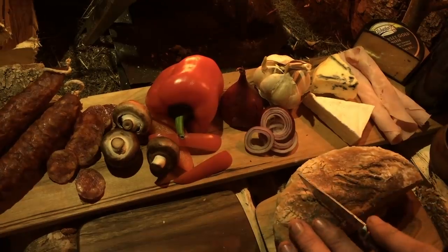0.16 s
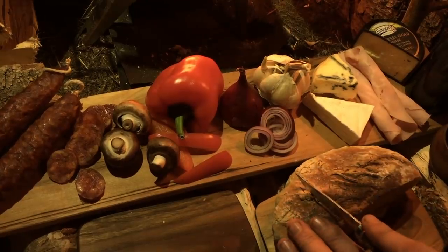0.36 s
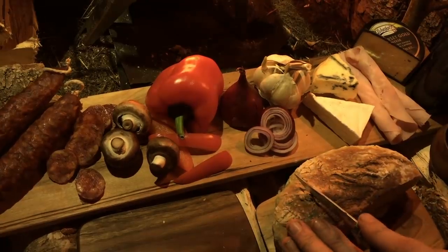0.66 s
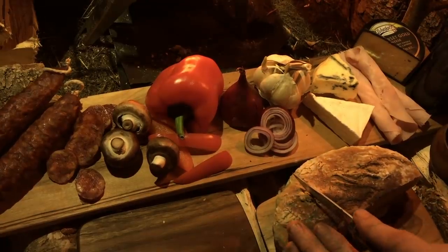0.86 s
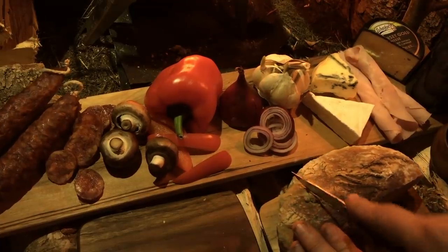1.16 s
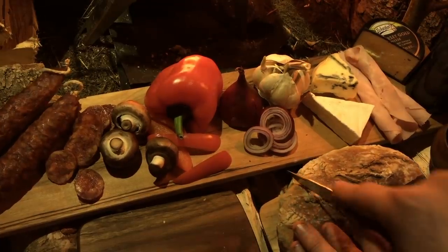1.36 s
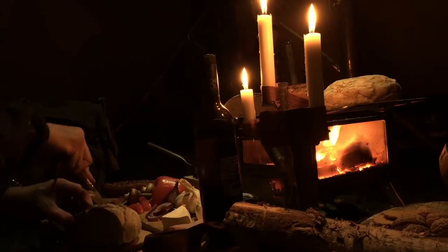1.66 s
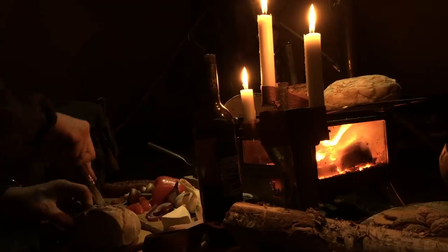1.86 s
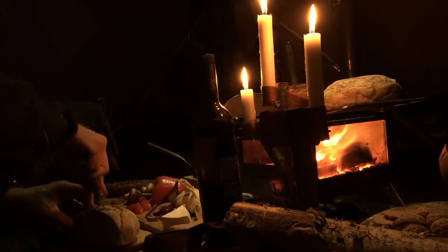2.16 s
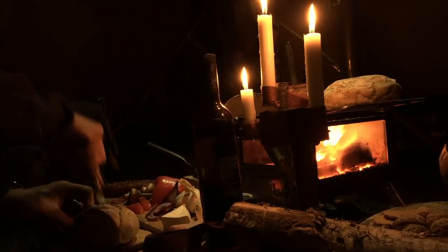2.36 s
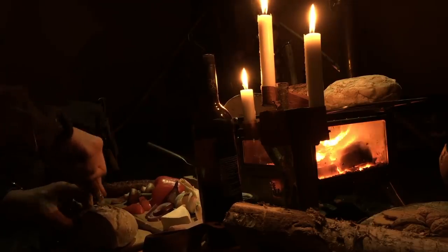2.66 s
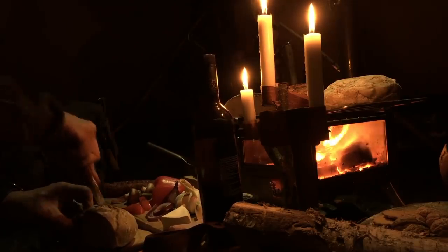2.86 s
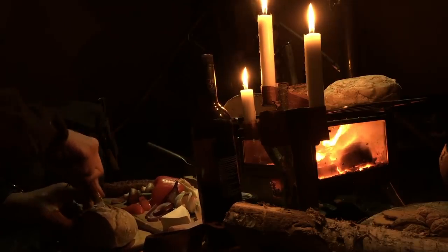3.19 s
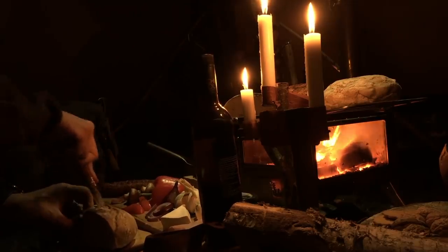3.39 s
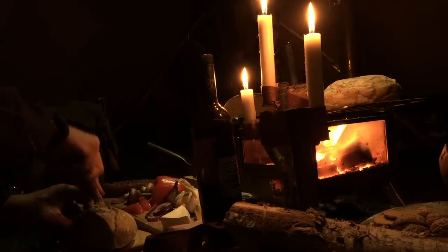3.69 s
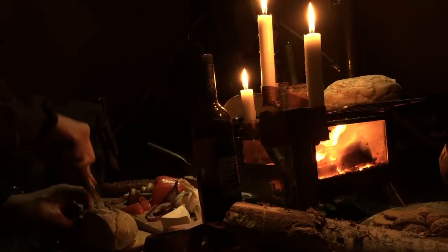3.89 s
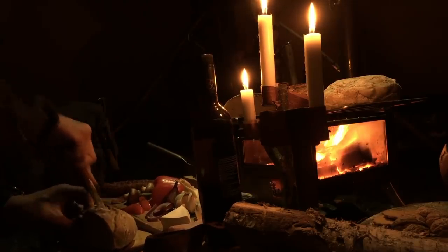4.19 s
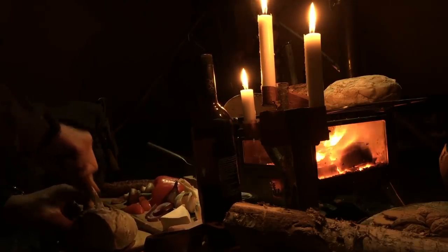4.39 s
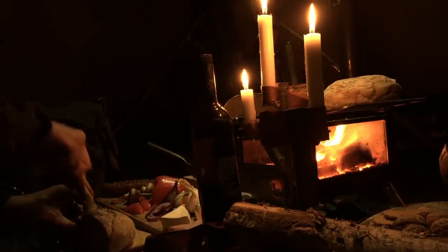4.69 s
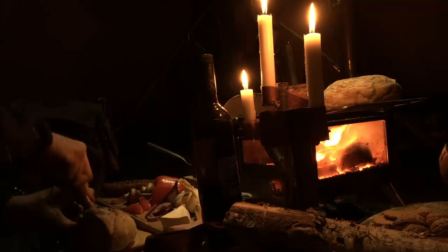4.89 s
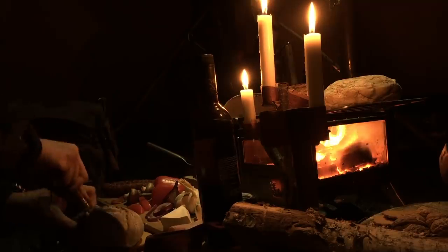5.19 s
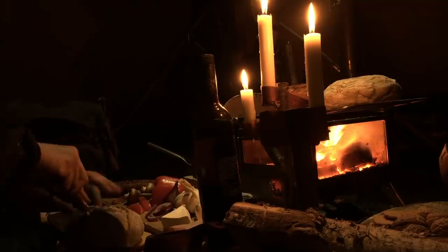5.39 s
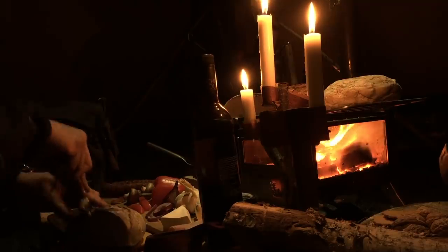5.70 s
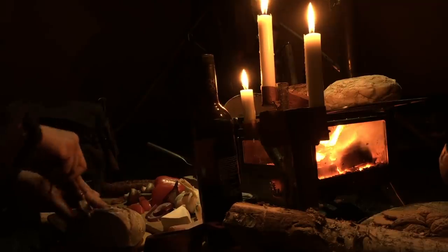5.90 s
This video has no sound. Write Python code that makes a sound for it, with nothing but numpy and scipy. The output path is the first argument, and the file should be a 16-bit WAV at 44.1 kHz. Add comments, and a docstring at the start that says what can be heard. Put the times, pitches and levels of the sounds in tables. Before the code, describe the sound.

A knife saws in short, crunchy strokes through a crusty loaf while a wood stove rumbles softly and crackles with sharp snaps close by.

```python
"""In a small shelter beside a wood stove, a knife saws through a crusty loaf.
The blade rasps through crust and crumb (grainy noise) and shakes the loaf (noise through resonances).
Crust and burning wood snap (short noise bursts), splinters ring, and the blade knocks on the cutting board.
The stove rumbles and hisses (coloured noise). From 1.55 s on, loaf and stove are heard from another spot,
where the draught hums (two wavering sine tones)."""
import sys
import numpy as np
from scipy import signal
from scipy.fft import rfft, irfft, next_fast_len
from scipy.io import wavfile
from scipy.ndimage import uniform_filter1d, map_coordinates

SR = 44100
rng = np.random.default_rng(int(sys.argv[2]) if len(sys.argv) > 2 else 0)


def generate_wav(sig):
    """Save sig (samples, or channels by samples) to the path in sys.argv[1] as 16-bit PCM at SR."""
    pcm = np.round(np.clip(np.atleast_2d(sig).T, -1, 1) * 32767).astype(np.int16)
    wavfile.write(sys.argv[1], SR, pcm)


N = 266799

# Sharp cracks of crust and embers, levels before the final trims:
# start_s [s], treble_db [dB], body_db [dB, low part compared with treble]
CRACKS = [(0.2273, -29, 2.5), (0.2664, -22.5, -25), (0.4373, -34, -3), (0.474, -23, -5.5),
          (0.6473, -19, -9), (0.676, -22.5, -1.5), (0.7172, -16.5, -17), (0.7745, -10.5, -17),
          (0.8403, -14, -18), (0.9189, -11, -19), (0.928, -16.5, -8), (0.9688, 4.5, -1.5),
          (0.9862, -4.5, -12), (1.0525, 1.5, -38), (1.07, -5.5, -19), (1.0773, -16.5, -4), (1.1046, -15, 1),
          (1.117, -17, 3.5), (1.1446, 2, -4), (1.251, -22, -9), (1.2652, -18, -15), (1.34, -12.5, -16),
          (1.3492, -12.5, -11.5), (1.39, -14, -25), (1.4421, -18, -33), (1.4735, -27, -23),
          (1.4887, -12.5, -14), (1.5657, -16, -14), (1.6303, -15.5, -1.5), (1.8372, -17, -15),
          (1.8486, -28, -13), (1.9033, -28, -19), (1.94, -20, -13), (1.9802, -7.5, -19), (2.0026, 5, -8),
          (2.056, -8, -26), (2.1061, -5.5, -11), (2.134, -15, -13), (2.147, -8.5, -4.5), (2.1683, -11, -17),
          (2.187, -15, -20), (2.2151, -13.5, -4.5), (2.308, -24, -10), (2.346, -27, 3.5),
          (2.4183, -21, -22), (2.668, -14.5, -18), (2.7158, -23, -18), (2.7285, -20, -30), (2.765, -22, -3),
          (2.782, -24, 1), (2.812, -14, -5.5), (2.8859, -12, -11.5), (2.903, -12, -37), (2.909, -9.5, -26),
          (2.952, -9, -30), (2.996, -11, -44), (3.0493, -3.5, -10.5), (3.0575, 2.5, 2.5),
          (3.0682, 1.5, -1.5), (3.133, -18, -3.5), (3.162, -8.5, -18), (3.173, -3, -47), (3.2032, -16, -30),
          (3.237, -3.5, -38), (3.2429, -15, -28), (3.2524, -18, -15), (3.277, -6.5, -21), (3.29, -6.5, -29),
          (3.311, -12, -16), (3.3647, -29, 6.5), (3.3708, -6.5, -54), (3.4507, -10.5, -4.5),
          (3.461, -11.5, -4.5), (3.5248, -5.5, -16), (3.5352, -9, -25), (3.5472, -7, -23), (3.562, -8, -26),
          (3.585, -11.5, -30), (3.663, -25, 1.5), (3.7185, -12, -15), (3.743, -10.5, -22),
          (3.9098, -3.5, 5.5), (3.9412, -13, -21), (3.954, -22, -20), (4.0243, -10, -15), (4.0366, -10, -8),
          (4.0627, -15, 2), (4.132, -28, -22), (4.147, -14, -14), (4.176, -18, -24), (4.185, -24, -24),
          (4.1916, -13, -9.5), (4.293, -26, -11), (4.301, -27, -9), (4.339, -7.5, -5.5), (4.3996, -8, -28),
          (4.4146, -10, -15), (4.42, -9, -30), (4.458, -5, -30), (4.4612, -9, -25), (4.5534, -8.5, -9),
          (4.579, -0.5, -10.5), (4.5983, -7, -12), (4.6263, 5.5, -11), (4.6685, -5, -9), (4.6923, -8, -10),
          (4.733, -11, -5.5), (4.772, -5.5, -22), (4.784, -10, -18), (4.797, 1, -10.5), (4.816, -14, -20),
          (4.9094, -33, 10.5), (4.9178, -26.5, 2.5), (4.9258, -26, -14), (5.072, -12.5, -25),
          (5.1826, -22, 1), (5.2212, -5, -19), (5.238, -30, 3), (5.2473, -26, -16), (5.253, -7.5, -15),
          (5.2651, -26, -24), (5.29, -18.5, -12.5), (5.5062, -26, 1.5), (5.5119, -16, -3.5),
          (5.6565, -8.5, -14), (5.6642, -4, -6), (5.778, -23, -4), (5.8558, -25.5, -16),
          (6.0187, -23, -1.5), (6.033, -17, -21)]


def amp(db):
    """Turn decibels into a gain."""
    return 10 ** (np.asarray(db) / 20)


def unit(x):
    """Scale a sound to an average (rms) level of 1."""
    return x / np.sqrt(np.mean(x ** 2) + 1e-20)


def curves(rows):
    """Draw straight lines between table rows: one value per sample for each column after the time."""
    start_s, *columns = np.transpose(rows)
    now_s = np.arange(N) / SR
    return [np.interp(now_s, start_s, column) for column in columns]


def wobble(rate):
    """A smooth random curve through `rate` random points a second."""
    points = rng.standard_normal(int(N * rate / SR) + 4)
    return map_coordinates(points, [np.arange(N) * rate / SR])


def coloured(x, points):
    """Filter x to a (Hz, dB) curve without pre-echo; white noise keeps its rms level."""
    hz, db = np.transpose(points)
    size = 2 ** 14
    bin_hz = np.fft.rfftfreq(size, 1 / SR)
    gain_db = np.interp(np.log(bin_hz + 1), np.log(hz + 1), db)
    # folding the cepstrum puts the filter's energy as early as possible
    cepstrum = irfft(np.log(amp(gain_db) + 1e-5))
    cepstrum[1:size // 2] *= 2
    cepstrum[size // 2 + 1:] = 0
    pulse = irfft(np.exp(rfft(cepstrum)))
    return signal.fftconvolve(x, pulse / np.linalg.norm(pulse))[:N]


def resonant(x, modes):
    """Noise through (Hz, width Hz, dB) resonances, fading out below the first one; rms 1."""
    size = next_fast_len(N + SR // 2)
    f = np.fft.rfftfreq(size, 1 / SR)
    response = 0
    for k, (hz, width_hz, db) in enumerate(modes):
        # neighbouring resonances take opposite signs
        band = 1j * f * width_hz
        response = response + (-1) ** k * amp(db) * band / (hz * hz - f * f + band)
    low_cut = 1 + (0.75 * modes[0][0] / (f + 1)) ** 8
    return unit(irfft(rfft(x, size) * response / low_cut, size)[:N])


def patchy(x, depth_db):
    """x with random louder and softer patches in time and frequency."""
    spectrum = signal.stft(x, nperseg=256)[2]
    field = uniform_filter1d(rng.standard_normal(spectrum.shape), 5, 0)
    field = uniform_filter1d(field, 9, 1)
    return signal.istft(spectrum * amp(depth_db * unit(field)), nperseg=256)[1][:N]


def crumbs(rate, spread_db, life_s):
    """Noise in short bursts of very unequal size, `rate` a second, each falling 60 dB in life_s."""
    starts = rng.random(N) < rate / SR
    sizes = starts * amp(spread_db * np.minimum(rng.exponential(size=N), 3.5))
    t = np.arange(SR // 20) / SR
    envelope = signal.fftconvolve(sizes, amp(-60 * t / life_s))[:N]
    return unit(envelope * rng.standard_normal(N))


def far_spot():
    """0 at the first listening spot, 1 at the second, with a short crossfade."""
    move_s, fade_s = 1.55, 0.048
    return np.clip((np.arange(N) / SR - move_s) / fade_s, 0, 1)


def knife():
    """Teeth tear the crust in grains; the same tearing shakes the hollow loaf."""
    # Colour of the torn crust: pitch_hz [Hz], level_db [dB per Hz]
    crust_colour = [(1180, -57.5), (2000, -5.5), (3160, -11), (3710, -8.5), (5320, -3.5), (7840, -7),
                    (8720, -3.5), (10700, -4.5), (13200, -4), (15700, -9), (16400, -47)]
    # Loaf resonances heard at the first spot: pitch_hz [Hz], width_hz [Hz], level_db [dB]
    near_modes = [(650, 300, -14), (1300, 240, 0), (1800, 250, -5), (2700, 180, -3), (3800, 240, -2),
                  (6200, 250, -9)]
    # Loaf resonances heard at the second spot: pitch_hz [Hz], width_hz [Hz], level_db [dB]
    far_modes = [(691, 172, 3), (1760, 304, 1), (2520, 90, -0.5), (3140, 170, -1.5), (4130, 210, -1),
                 (5500, 430, -2)]
    # Sawing carried into the table: pitch_hz [Hz], level_db [dB per Hz]
    table_colour = [(120, -14), (200, -3.5), (300, -3.5), (400, -17), (550, -17.5)]
    rasp_db, loaf_db = effort()
    far = far_spot()
    # the blade sticks and slips: a random level in dB
    jerks_db = 1.5 * wobble(80)
    tearing = 0.36 * crumbs(rate=500, spread_db=2.5, life_s=0.004) + 0.55 * rng.standard_normal(N)
    shaking = 0.55 * crumbs(rate=300, spread_db=2, life_s=0.015) + 0.75 * rng.standard_normal(N)
    shaking += 0.2 * tearing
    rasp = unit(amp(jerks_db) * coloured(patchy(tearing, depth_db=2.5), crust_colour))
    loaf = (1 - far) * resonant(shaking, near_modes) + far * resonant(shaking, far_modes)
    loaf += far * amp(-11.5) * coloured(shaking, table_colour)
    return amp(rasp_db + 0.12) * rasp + amp(loaf_db + 0.74 + jerks_db) * loaf


def effort():
    """Rasp and loaf level in dB: strokes, crumbs after each crack and a rest level add as powers."""
    # Knife strokes: start_s [s], length_s [s], rasp_start_db [dB], rasp_end_db [dB],
    # loaf_db [dB, compared with the rasp]
    strokes = [(0.127, 0.013, -34.5, -50, -21), (0.205, 0.029, -49, -41.5, 2),
               (0.306, 0.031, -50, -51.5, 7), (0.414, 0.0068, -63, -46.5, 8), (0.596, 0.34, -47, -52, -4),
               (1.065, 0.033, -49, -30.5, -2), (1.275, 0.14, -42.5, -42, -5), (1.471, 0.11, -46, -39, -6),
               (1.581, 0.15, -49.5, -40.5, -7), (1.854, 0.15, -45, -55, -9.5),
               (2.021, 0.18, -30, -30.5, -5), (2.345, 0.097, -45.5, -41, -2.5),
               (2.508, 0.093, -52, -30.5, -6.5), (2.614, 0.073, -36, -39.5, -0.5),
               (2.814, 0.13, -36, -54, -6.5), (3.151, 0.27, -39.5, -41.5, -7),
               (3.511, 0.12, -32.5, -37.5, -3), (3.72, 0.14, -40, -43.5, -5),
               (3.913, 0.15, -30.5, -30.5, -8), (4.149, 0.11, -42.5, -41, -5),
               (4.339, 0.15, -38.5, -29, -3.5), (4.576, 0.16, -32.5, -33.5, -8.5),
               (4.779, 0.044, -26, -32.5, 3.5), (4.91, 0.04, -52, -42, -4), (4.977, 0.14, -40, -36.5, -2.5),
               (5.188, 0.061, -41.5, -52, -12), (5.601, 0.046, -54.5, -65, 7),
               (5.787, 0.02, -33.5, -48, -11.5), (5.99, 0.063, -61, -41, -10)]
    # Faint crumbling between strokes: start_s [s], rasp_db [dB], loaf_db [dB]
    rest = [(0, -48, -59.5), (2.3, -52, -57.5), (6.05, -54, -60.5)]
    # the teeth bite quickly and leave the crumb more slowly
    bite_db_per_s, lift_db_per_s = 1200, 455
    # crumbs shower after a crack: level compared with it, fade, share of its body_db given to the loaf
    crumble_start_db, crumble_db_per_s, loaf_share = -24, 412, 0.7

    t = np.arange(0, N + 16, 16) / SR  # every 16th sample is enough
    start_s, length_s, start_db, end_db, loaf_db = np.transpose(strokes)[..., None]
    stroke_db = start_db + (end_db - start_db) * np.clip((t - start_s) / length_s, 0, 1)
    stroke_db = stroke_db - bite_db_per_s * np.maximum(start_s - t, 0)
    stroke_db = stroke_db - lift_db_per_s * np.maximum(t - start_s - length_s, 0)

    crack_s, treble_db, body_db = np.transpose(CRACKS)[..., None]
    fading_db = treble_db + crumble_start_db - crumble_db_per_s * (t - crack_s)
    crumble_db = np.where(t > crack_s, fading_db, -200)

    rasp_layers = (stroke_db, crumble_db)
    loaf_layers = (stroke_db + loaf_db, crumble_db + loaf_share * body_db)
    levels_db = []
    for layers, rest_db in zip((rasp_layers, loaf_layers), curves(rest)):
        power = sum(np.sum(amp(db) ** 2, 0) for db in layers)
        power = np.interp(np.arange(N) / SR, t, power)
        levels_db.append(10 * np.log10(power + amp(rest_db) ** 2))
    return levels_db


def snaps():
    """Each crack is a burst of a few milliseconds, then a weaker tail of splinters and near walls."""
    # Edge of a crack: pitch_hz [Hz], level_db [dB per Hz]
    edge_colour = [(1500, -81), (3000, -29.5), (4500, 2), (9000, 6.5), (13500, 6.5), (15700, 4),
                   (16500, -35)]
    # Body of a crack: pitch_hz [Hz], level_db [dB per Hz]
    body_colour = [(90, -23), (230, 0.5), (430, -3.5), (700, 4.5), (1700, 6.5), (2500, 13), (3500, 1.5),
                   (4800, 10), (6500, 2.5), (9200, 6.5), (13000, -7)]
    treble, body, t = np.zeros(N + SR), np.zeros(N + SR), np.arange(SR // 10) / SR
    tail = amp(-18.0 - 60 * t / 0.02)
    rise = 1 - np.exp(-t / 0.00016)
    treble_fade = amp(-60 * t / 0.0032) + tail
    body_fade = amp(-60 * t / 0.012) + amp(-13.0) * tail
    for start_s, db, body_db in CRACKS + ticks():
        i = round(start_s * SR)
        noise = np.sign(rng.standard_normal(len(t))) + 0.5 * rng.standard_normal(len(t))
        # every splinter has its own colour, a comb of chance spacing
        noise = rise * unit(noise + 0.6 * np.roll(noise, rng.integers(4, 24)))
        treble[i:][:len(t)] += amp(db - 1.0) * treble_fade * noise
        body[i:][:len(t)] += amp(db + body_db) * body_fade * noise
        # the first break is one firm push
        body[i] += amp(db + body_db + 11)
    return coloured(treble, edge_colour) + amp(-4.5) * coloured(body, body_colour)


def ticks():
    """Thin, mostly faint ember ticks at random times, as rows like the cracks."""
    ticks_per_s, base_db, spread_db = 6, -35, 2.5
    draw = rng.random((round(ticks_per_s * N / SR), 3))
    return [(u * N / SR, base_db - spread_db * np.log(v), -10 - 15 * w) for u, v, w in draw]


def splinters():
    """After every listed crack six short modes ring at chance pitches; low ones follow its body."""
    below_crack_db, t60_s = -21.5, 0.029
    low_hz, high_hz = 910, 8960
    out, t = np.zeros(N + SR), np.arange(SR // 16) / SR
    places = rng.random((len(CRACKS), 6, 1))  # 0 = lowest pitch, 1 = highest
    for (start_s, db, body_db), place in zip(CRACKS, places):
        hz = low_hz * (high_hz / low_hz) ** place
        modes = amp((1 - place) * body_db) * np.sin(2 * np.pi * hz * t)
        fade = amp(db + below_crack_db - 60 * t / t60_s)
        out[round(start_s * SR):][:len(t)] += fade * modes.sum(0)
    return out[:N]


def pings():
    """A splinter rings as it breaks: one short sine, roughened by random phase steps."""
    # Ringing splinters: start_s [s], peak_db [dB], pitch_hz [Hz]
    ping_rows = [(0.4379, -22, 1450), (1.6306, -16.5, 4580), (3.4502, -13.5, 4570), (3.4618, -22, 4470)]
    t60_s = 0.01
    out, t = np.zeros(N + SR), np.arange(SR // 16) / SR
    for start_s, db, hz in ping_rows:
        roughness = np.cumsum(rng.normal(0, 0.12, len(t)))
        tone = np.sin(2 * np.pi * hz * t + roughness)
        out[round(start_s * SR):][:len(t)] += amp(db - 60 * t / t60_s) * tone
    return out[:N]


def board():
    """The board answers the blade with a dry noise slap and a set of short, uneven ringing modes."""
    # Blade meets board, level before the trims below: start_s [s], level_db [dB], pitch_hz [Hz]
    knocks = [(1.722, -36, 670), (2.212, -21.5, 820), (2.346, -30.5, 704), (2.679, -15.5, 798),
              (3.155, -20, 836), (3.625, -18.5, 842), (4.064, -24.5, 802), (4.494, -21, 816),
              (4.816, -12, 787), (4.969, -37.5, 706), (5.075, -30, 860)]
    # Board modes: ratio [times the main pitch], level_db [dB], t60_s [s to fall 60 dB]
    board_modes = [(1, 0, .027), (1.07, -13, .08), (1.4, -8, .022), (.78, -5, .028), (.3, -13, .05),
                   (2, -14, .02), (2.6, -15, .02)]
    # The dry slap: pitch_hz [Hz], level_db [dB per Hz]
    slap_colour = [(150, 22), (260, -7), (900, -20), (2100, -21), (5000, -40)]
    slap_db, slap_t60_s = -1.5, 0.025
    out, slap, t = np.zeros(N + SR), np.zeros(N + SR), np.arange(SR // 8) / SR
    rise = 1 - np.exp(-t / 0.0009)
    for start_s, db, hz in knocks:
        i = round(start_s * SR)
        ring = np.zeros(len(t))
        for ratio, level_db, t60_s in board_modes:
            unevenness = np.cumsum(rng.normal(0, 0.012, len(t)))
            ring += amp(level_db - 60 * t / t60_s) * np.sin(2 * np.pi * hz * ratio * t + unevenness)
        out[i:][:len(t)] += amp(db + 3.5) * ring * rise
        slap_fade = amp(db + slap_db - 60 * t / slap_t60_s)
        slap[i:][:len(t)] += slap_fade * rise * rng.standard_normal(len(t))
    return out[:N] + coloured(slap, slap_colour)


def blade():
    """The steel catches and rings on its own modes, each fluttering as the blade scrapes on."""
    # The blade catches, level before the trim below: start_s [s], level_db [dB]
    twangs = [(2.2162, -10)]
    # Steel modes: pitch_hz [Hz], level_db [dB], t60_s [s to fall 60 dB]
    steel_modes = [(2250, -4, 0.066), (3190, 4.5, 0.052), (4000, 0, 0.073), (4150, -11, 0.13),
                   (4020, -8, 0.12), (4800, -12, 0.019)]
    out, t = np.zeros(N + SR), np.arange(SR // 8) / SR
    rise = 1 - np.exp(-t / 0.0011)
    for start_s, db in twangs:
        ring = np.zeros(len(t))
        for hz, level_db, t60_s in steel_modes:
            fade = amp(level_db + rng.normal(0, 0.91) - 60 * t / t60_s)
            flutter = np.cumsum(rng.normal(0, 0.11, len(t)))
            ring += fade * np.sin(2 * np.pi * hz * t + flutter)
        out[round(start_s * SR):][:len(t)] += amp(db - 11.5) * ring * rise
    return out[:N]


def stove():
    """Flames rumble in the firebox, the flue hums unsteadily, sap hisses faintly."""
    # Rumble level before the trim below: start_s [s], level_db [dB]
    fire = [(0.0, -39), (4.7, -36.5), (6.05, -39)]
    # Rumble colour at the first spot: pitch_hz [Hz], level_db [dB per Hz]
    near_colour = [(12, -7.5), (20, 2.5), (97, -0.5), (129, -8.5), (198, -5), (244, -22), (541, -27.5),
                   (743, -30), (900, -31), (1170, -62), (1980, -120)]
    # Rumble colour at the second spot: pitch_hz [Hz], level_db [dB per Hz]
    far_colour = [(12, -34), (22, -12), (40, -3), (58, -8), (95, -6), (135, -10), (200, -19), (300, -29),
                  (600, -48)]
    # Draught in the flue: start_s [s], pitch_hz [Hz], level_db [dB]
    draught = [(1.55, 61.7, -43.5), (2.6, 60.8, -41.5), (3.3, 63.36, -47), (3.7, 64.4, -44.5),
               (4.15, 63.8, -51), (4.6, 65.6, -46.5), (5.2, 66.26, -42.5), (6.05, 67.2, -43)]
    # Hiss colour: pitch_hz [Hz], level_db [dB per Hz]
    hiss_colour = [(180, 0.5), (300, 10), (496, -6), (693, 1.5), (2060, 6.5), (3080, -1), (9310, -6),
                   (15100, -53), (16400, -60)]
    far = far_spot()
    near_roar = coloured(rng.standard_normal(N), near_colour)
    far_roar = coloured(rng.standard_normal(N), far_colour)
    rumble_db = curves(fire)[0] - 1.0 + 1.9 * wobble(7.7)
    rumble = amp(rumble_db) * ((1 - far) * near_roar + 0.52 * far * far_roar)

    hz, db = curves(draught)
    phase = 2 * np.pi * np.cumsum(hz + 0.31 * wobble(5.8)) / SR
    tones = np.sin(phase) + amp(-14.5) * np.sin(2 * phase)
    hum = far * np.sqrt(2) * amp(db) * tones  # root 2 turns an rms level into a sine's peak

    hiss = amp(-58.0) * coloured(rng.standard_normal(N), hiss_colour)
    return rumble + hum + hiss


def scene():
    """Everything reaches one microphone, so the sounds simply add."""
    cutting = knife() + board() + blade()
    cracking = snaps() + splinters() + pings()
    return (cutting + cracking + stove())[None]


def record(dry):
    """The loudest peaks round off at full scale; the microphone has a dip near 10 kHz and a band limit."""
    top_hz = 16600
    clipped = dry / (1 + np.abs(dry) ** 8) ** (1 / 8)
    size = next_fast_len(N + SR // 2)
    hz = np.fft.rfftfreq(size, 1 / SR)
    dip = amp(-7 * np.exp(-((hz - 10450) / 330) ** 2))
    return irfft(rfft(clipped, size) * dip * (hz < top_hz), size)[:, :N]


dry = scene()
out = record(dry)
generate_wav(out)
```